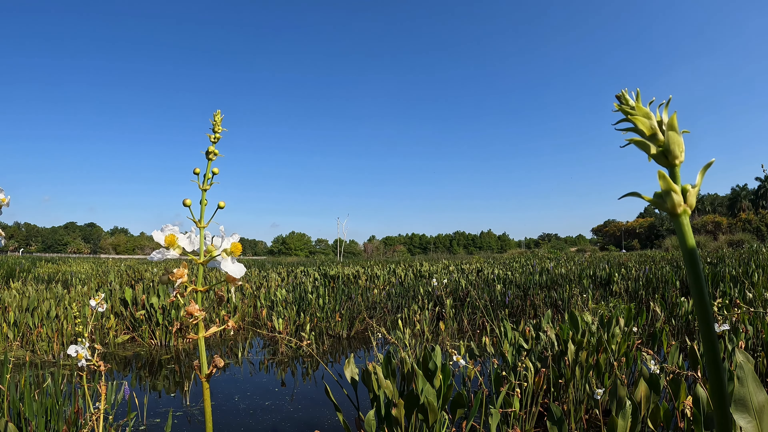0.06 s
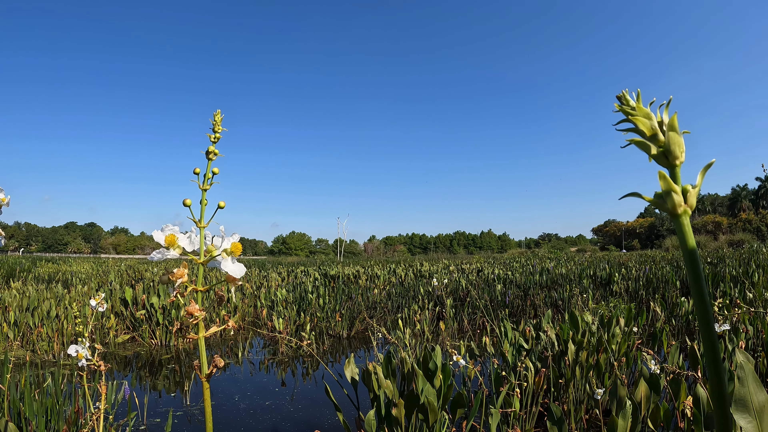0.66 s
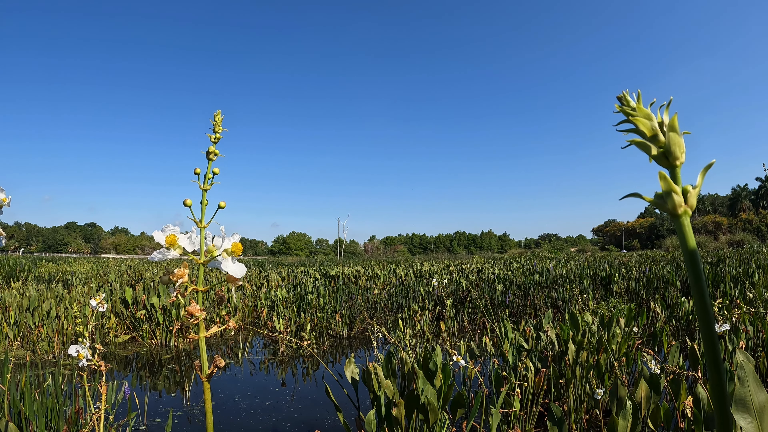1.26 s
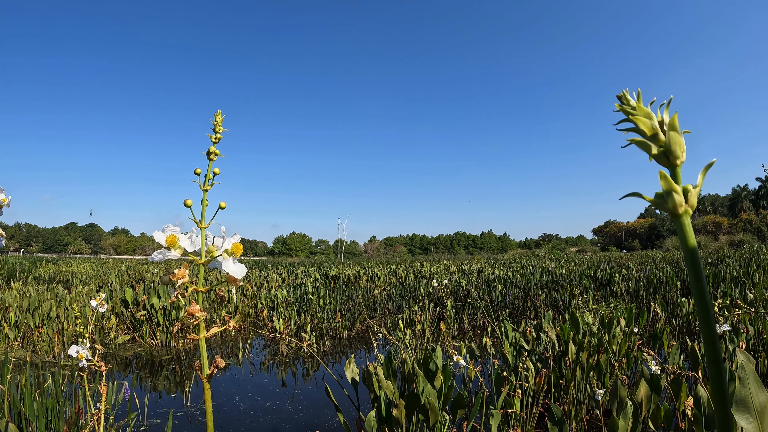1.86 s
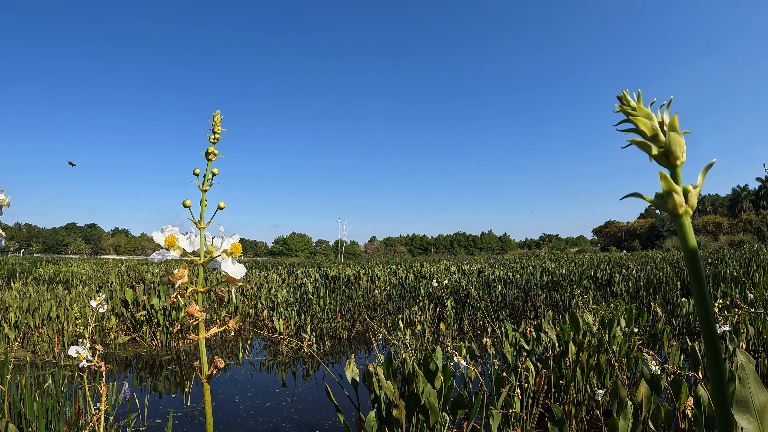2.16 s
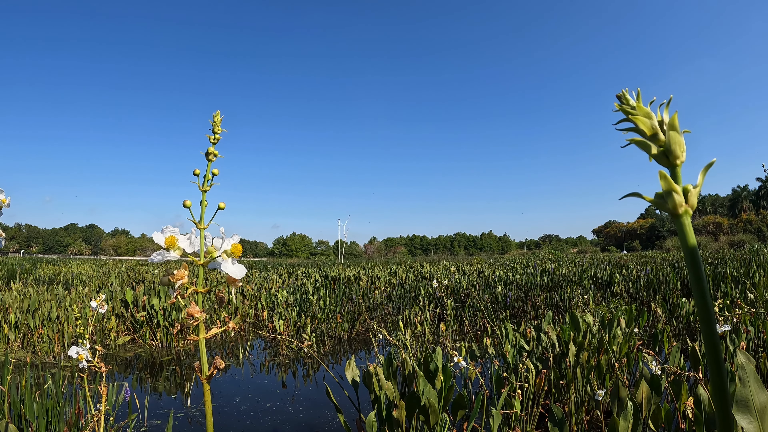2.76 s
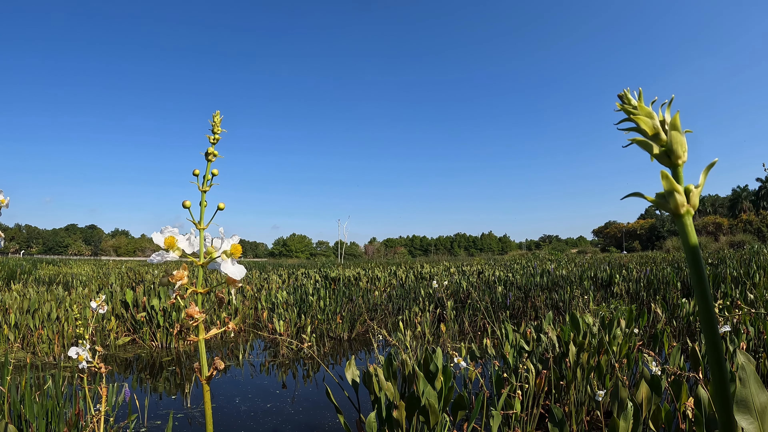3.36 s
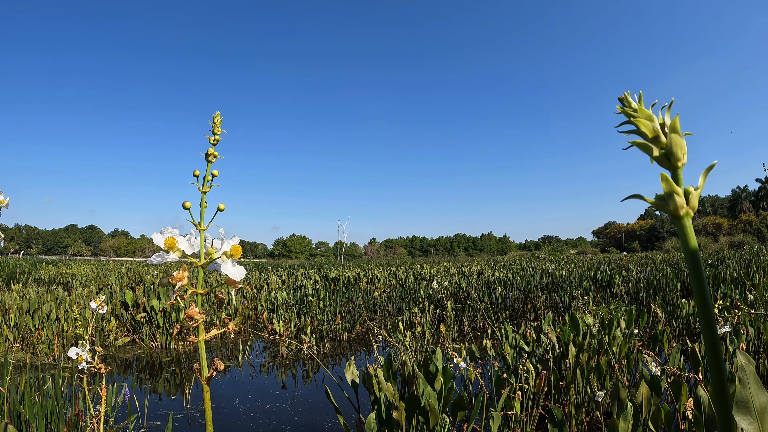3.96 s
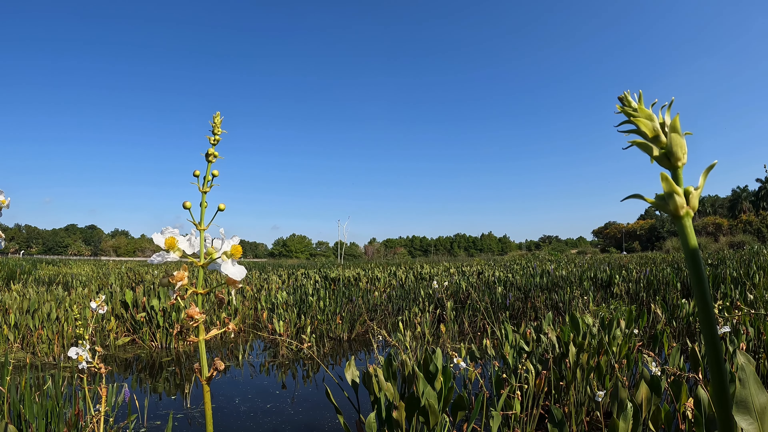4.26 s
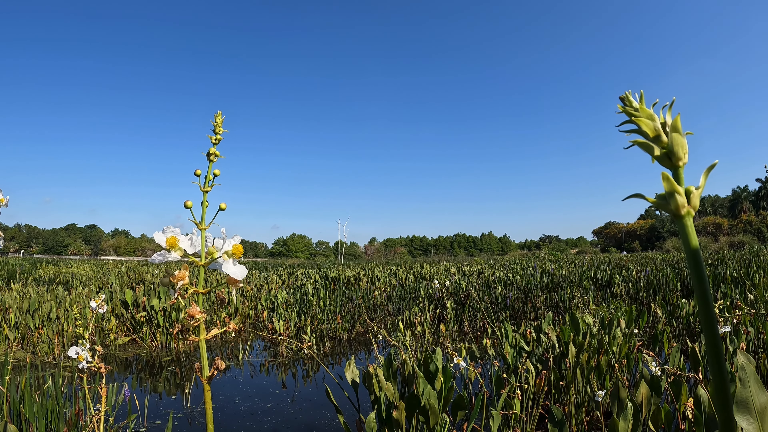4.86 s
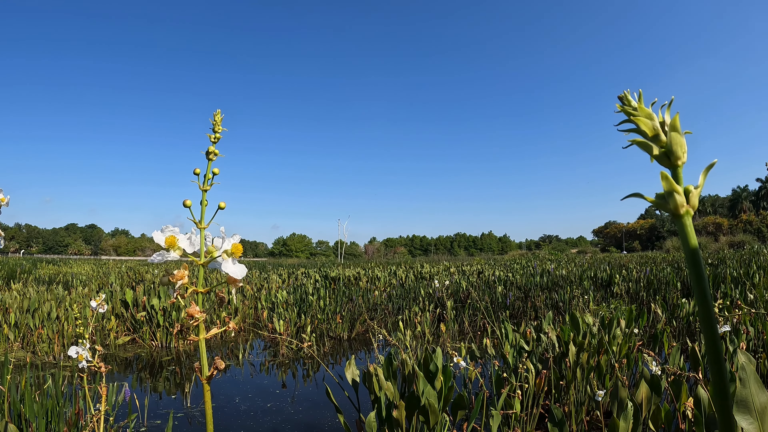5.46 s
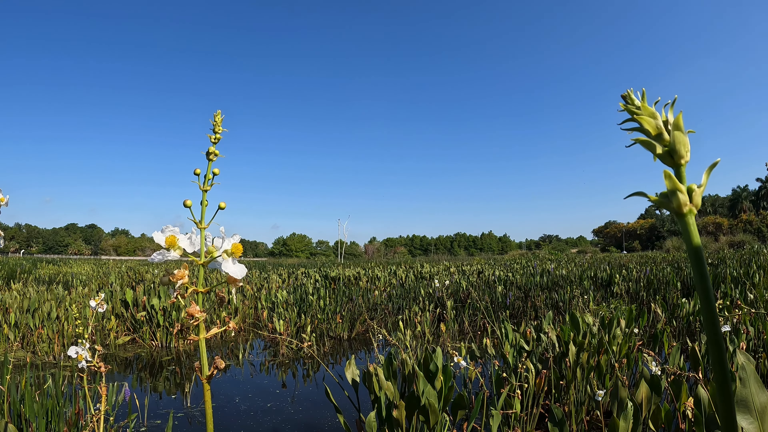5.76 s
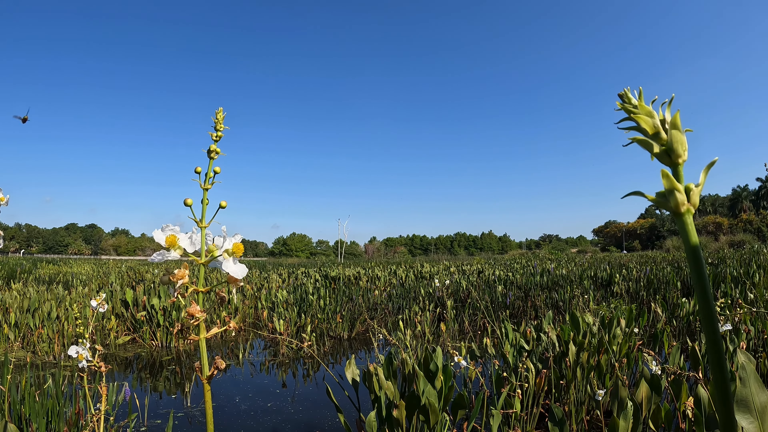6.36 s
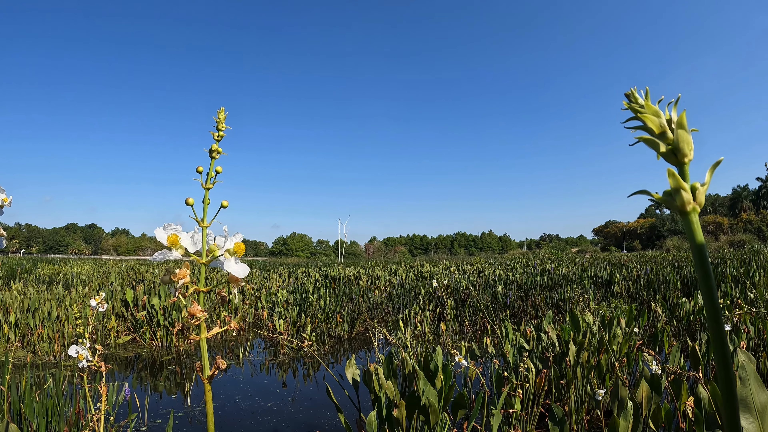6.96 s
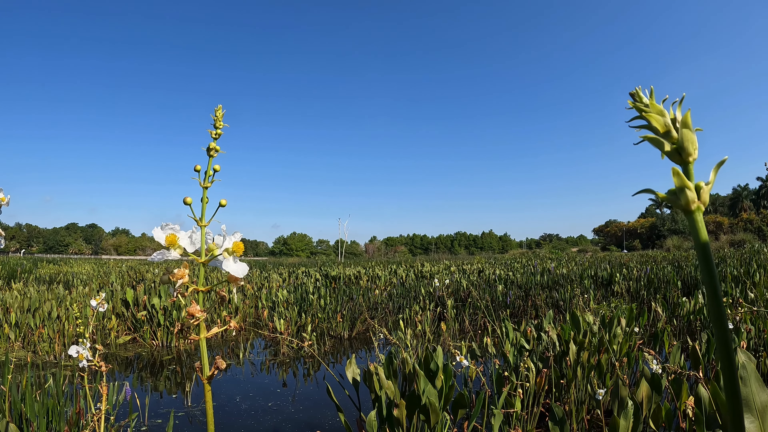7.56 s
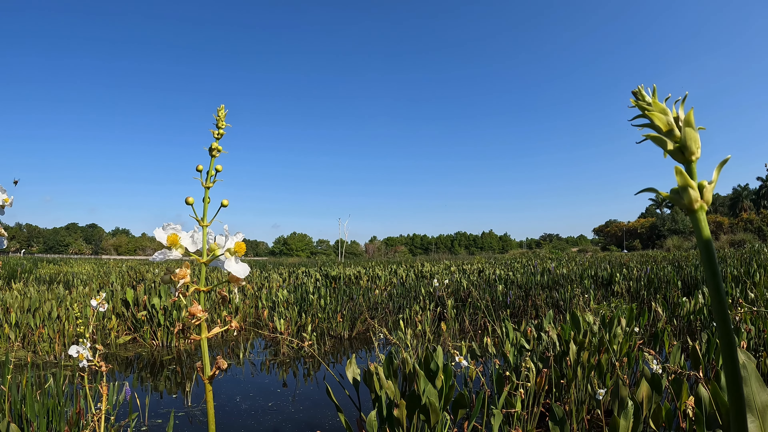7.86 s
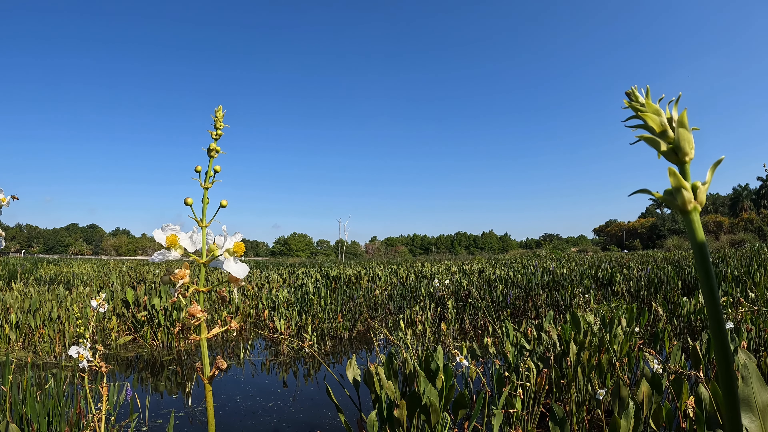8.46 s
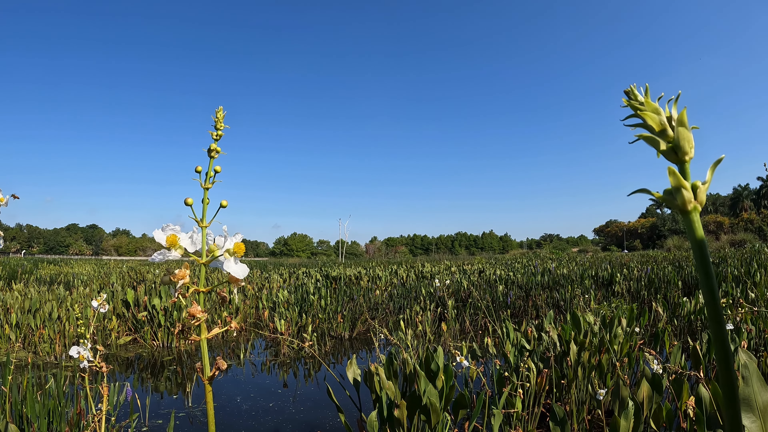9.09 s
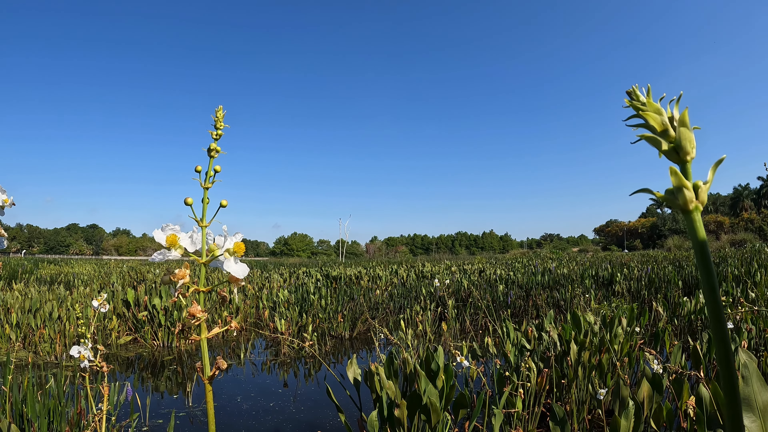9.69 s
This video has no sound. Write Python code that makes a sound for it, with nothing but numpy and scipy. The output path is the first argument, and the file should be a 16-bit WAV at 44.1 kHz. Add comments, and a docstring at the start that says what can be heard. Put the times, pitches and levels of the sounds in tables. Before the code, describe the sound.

Distant traffic rumbles low beneath quiet wetland birdsong, with a few soft gusts on the microphone at first. A wading bird yelps again and again, pausing briefly midway. A blackbird sings one gurgling phrase ending in a buzz, followed by a run of dry chacks. Short chirps, rasps and mews come from the reeds, with far hoots late on and faint, high insect bursts all along.

```python
"""Still morning on a freshwater marsh.

A wading bird yelps over and over, harmonics bending down through its throat resonances. A blackbird
sings one gurgle and buzzing trill, and other birds mew, whistle, hoot, chack and rasp from the reeds.
Insects scrape their wings in shrill bursts. Distant traffic rumbles and a light breeze brushes
the microphone."""
import sys
import numpy as np
from scipy import signal
from scipy.fft import rfft, irfft, next_fast_len
from scipy.io import wavfile
from scipy.ndimage import uniform_filter1d

SR = 44100
rng = np.random.default_rng(int(sys.argv[2]) if len(sys.argv) > 2 else 0)


def file_out(sig):
    """Save sig as 16-bit WAV at sys.argv[1]."""
    # one column per channel
    cols = np.atleast_2d(sig).T
    # limit, then scale
    lim = np.clip(cols, -1, 1)
    pcm = np.round(lim * 32767).astype(np.int16)
    wavfile.write(sys.argv[1], SR, pcm)


N = 429093
TIME = np.arange(N) / SR


def from_db(db):
    """Decibels to gain."""
    return 10 ** (np.asarray(db) / 20)


def rms_one(x):
    """Scale to rms 1."""
    return x / np.sqrt(np.mean(x ** 2) + 1e-20)


def phase_of(hz):
    """Running phase of a moving pitch."""
    return 2 * np.pi * np.cumsum(hz) / SR


def gain_at(points, hz):
    """Gain of an EQ curve on a log-frequency axis; it rolls off above the last point."""
    f, db = np.transpose(points)
    return from_db(np.interp(np.log(hz + 1e-3), np.log(f), db)) / np.maximum(hz / f[-1], 1) ** 4


def wobble(size, rate):
    """Smooth random modulation of spread 1 that changes rate times a second."""
    knots = rng.standard_normal(N // 64)
    position = np.arange(size) * rate / SR % len(knots)
    return np.interp(position, np.arange(len(knots)), knots) / np.sqrt(2 / 3)


def swells(crests, rise_s, fall_s):
    """Gain that rises to each crest (s, dB) and sinks again."""
    power = 0
    for crest, db in crests:
        offset = (TIME - crest) / np.where(TIME < crest, rise_s, fall_s)
        power += from_db(db) ** 2 / (1 + offset ** 2) ** 3
    return np.sqrt(power)


def pan(x, left_db):
    """Lean a sound to the left by a level difference."""
    return x * from_db(np.array([[.5], [-.5]]) * left_db)


def noise(colour, alike):
    """Coloured stereo noise of rms 1; alike runs from 0 (wide) to 1 (mono)."""
    white = rng.standard_normal((2, N))
    mid, side = irfft(rfft(white) * gain_at(colour, np.fft.rfftfreq(N, 1 / SR)), N)
    return rms_one(np.sqrt(1 + alike) * mid + np.sqrt(1 - alike) * side * [[1], [-1]])


def butter(x, order, hz, kind="low"):
    """Butterworth filter."""
    return signal.sosfilt(signal.butter(order, hz, kind, fs=SR, output="sos"), x)


def add(out, start, sound, level_db, edge):
    """Place a note, fading in and out over a share of its length."""
    u = np.linspace(0, 1, len(sound))
    fade = np.sin(np.pi / 2 * np.clip(np.minimum(u, 1 - u) / max(edge, .02), 0, 1)) ** 2
    at = max(int(start * SR), 0)
    out[at:at + len(sound)] += (from_db(level_db) * fade * rms_one(sound))[:N - at]


def marsh(x, left_db, wet_db, t60):
    """Reeds and the tree line scatter a call into a short, thin tail."""
    t = np.arange(SR) / SR
    shared, *own = rng.standard_normal((3, SR)) * (rng.random((3, SR)) < .05)
    tail = (shared + 0.55 * np.array(own)) * from_db(-60 * t / t60) * (1 - np.exp(-t / 0.0031))
    tail /= np.sqrt(np.sum(tail ** 2, axis=1, keepdims=True))
    wet = signal.fftconvolve(x[None], tail, axes=1)[:, :N]
    return pan(x + from_db(wet_db) * wet, left_db)


def reeds():
    """The faint steady hush of the reed bed."""
    return from_db(-74.5) * noise([(3200, -6), (4500, -7), (13000, -20)], alike=0.69)


# EQ of far engines, one heavier vehicle and tyres. Each row: frequency in Hz, gain in dB.
ENGINE_EQ = [(15, -4.5), (30, 5), (45, 0.5), (65, 0.5), (90, 0.5), (125, -8), (190, -14), (250, -22.5),
             (330, -28.5), (550, -39), (1200, -84)]
VEHICLE_EQ = [(50, -4), (95, 2), (165, -3.5), (260, -19.5), (500, -32.5)]
TYRE_EQ = [(350, -8.5), (600, -11), (750, 0), (930, 2), (1200, -3.5), (1600, -10.5), (2000, -16.5)]
# The tyre rush creeps up. Each row: time in seconds, relative level in dB.
TYRE_FADER = [(0.0, -60), (4.44, -59), (9.73, -54.5)]


def traffic():
    """Soft ground swallows the middle, leaving engine rumble below and tyre rush near 1 kHz."""
    engines = from_db(-38) * noise(ENGINE_EQ, alike=.99)
    vehicle = swells([(3.92, -43)], rise_s=1, fall_s=1) * noise(VEHICLE_EQ, alike=1)
    tyre_db = np.interp(TIME, *np.transpose(TYRE_FADER)) + 1.31
    return engines + vehicle + from_db(tyre_db) * noise(TYRE_EQ, alike=0.84)


# EQ of air on the microphone. Each row: frequency in Hz, gain in dB.
BREEZE_EQ = [(27, 7.5), (55, -24.5), (220, -25.5), (600, -46)]
# Three gusts. Each row: crest in seconds, level in dB.
GUSTS = [(.42, -33), (.99, -30), (1.88, -38.5)]


def breeze(lull_db=-41.5):
    """Lumpy eddies buffet the microphone, mostly on the right port."""
    strength = from_db(lull_db) + swells(GUSTS, rise_s=0.2, fall_s=0.2)
    eddies = from_db(1.1 * wobble(N, 11))
    return pan(strength * eddies * noise(BREEZE_EQ, alike=0.88), left_db=-8)


# EQ of the high insect sizzle. Each row: frequency in Hz, gain in dB.
SIZZLE_EQ = [(5000, -25), (7000, -2), (8500, -10.5), (10500, -4), (11450, -6.5), (11950, -2.5),
             (12400, -5.5), (13500, -21)]
# It swells about every three quarters of a second. Each row: crest in seconds, level in dB.
SIZZLE_SWELLS = [(.38, -77), (1.2, -78), (1.8, -76), (2.55, -72), (3.15, -72.5), (3.93, -75), (4.53, -75),
                 (5.38, -75), (6.15, -73.5), (6.8, -75), (7.45, -74), (8.33, -73.5), (8.95, -75.5),
                 (9.65, -76)]


def insect_chorus():
    """Many scraping wings blur into a far shrill and a higher, swelling sizzle."""
    far_eq = [(4200, -19.5), (5300, -8.5), (5780, -4), (6800, -20.5)]
    far = from_db(-70.5 + 1.75 * wobble(N, 6.5)) * noise(far_eq, alike=0.75)
    surge = swells(SIZZLE_SWELLS, rise_s=0.4, fall_s=0.31)
    return far + surge * from_db(wobble(N, 130)) * noise(SIZZLE_EQ, alike=0.75)


# EQ of the near insect, peaking around 6 kHz. Each row: frequency in Hz, gain in dB.
SHRILL_EQ = [(3500, -49), (4900, -55), (5550, -14), (5880, 2), (6030, -8.5), (6190, 4), (6330, -9),
             (6650, -22), (8000, -50)]
# Its rests between bursts. Each row: midpoint in seconds, length in seconds.
SHRILL_RESTS = [(0.233, 0.14), (0.807, 0.15), (1.143, 0.2), (1.734, .12), (2.13, 0.13), (2.713, 0.076),
                (3.444, 0.13), (4.11, 0.12), (4.373, 0.1), (4.745, 0.1), (5.08, 0.11), (5.688, 0.11),
                (6.63, 0.16), (6.983, .17), (7.59, 0.075), (7.95, .12), (8.58, 0.13), (8.99, 0.18)]


def near_insect(strokes_per_s=84, floor_db=-68, stroke_db=3.5):
    """A wing file scrapes in fast uneven strokes, pausing briefly between bursts."""
    singing = np.all([np.abs(TIME - rest) > length / 2 for rest, length in SHRILL_RESTS], axis=0)
    gate = uniform_filter1d(singing * 1.0, size=1500)
    strokes = np.cos(phase_of(strokes_per_s * (1 + .01 * wobble(N, 10))) / 2) ** 16
    teeth_db = wobble(N, 250)
    return gate * from_db(floor_db + stroke_db * strokes + teeth_db) * noise(SHRILL_EQ, alike=1)


def glides(notes, rise, rough):
    """Fluttering near-sine notes (start, length, Hz, dB) that slide by a share of their pitch."""
    out = np.zeros(N)
    for start, length, hz, level_db in notes:
        size = int(length * SR)
        slide = rise * np.linspace(-.5, .5, size)
        phase = phase_of(hz * (1 + slide + 0.09 * rough * wobble(size, 895)))
        add(out, start, np.sin(phase) * (1 + rough * wobble(size, 315)), level_db, edge=0.1)
    return out


# Thin, high whistles. Each row: start in seconds, level in dB.
WHISTLES = [(.224, -84), (3.08, -79)]
# Quick squeaks. Each row: start in seconds, pitch in Hz, level in dB.
SQUEAKS = [(1.355, 5120, -65), (2.428, 3830, -60.5), (5.913, 4170, -60.5)]
# Far hoots. Each row: start in seconds, length in seconds, pitch in Hz, level in dB.
HOOTS = [(4.61, 0.11, 922, -63.5), (8.428, 0.19, 921, -57.5), (9.227, 0.117, 970, -54.5)]


def whistles_and_hoots():
    """Almost pure bird tones: whistles sink, squeaks flick up and hoots stay nearly level."""
    whistles = glides([(start, 0.38, 6850, db) for start, db in WHISTLES], rise=-0.2, rough=0.11)
    squeaks = glides([(start, 0.033, hz, db) for start, hz, db in SQUEAKS], rise=0.22, rough=0.6)
    return whistles + squeaks + glides(HOOTS, rise=-0.024, rough=0.43)


def harsh(notes, fall, skirt_db, skirt_spread=2.6):
    """Grainy syrinx noise (start, length, Hz, width, dB) around a resonance that sinks by a share."""
    out = np.zeros(N)
    for start, length, hz, width_hz, level_db in notes:
        size = int(length * SR)
        air = rng.standard_normal((2, size)) * from_db(wobble(size, 350))
        core = butter(air, 3, width_hz / 2)
        skirt = butter(air, 3, skirt_spread * width_hz / 2)
        flutter = core + from_db(skirt_db) * skirt
        phase = phase_of(hz * (1 + fall * np.linspace(.5, -.5, size)))
        add(out, start, flutter[0] * np.cos(phase) + flutter[1] * np.sin(phase), level_db, edge=0.24)
    return out


# Dry chacks, about four a second. Each row: start in seconds, level in dB.
CHACKS = [(3.308, -63), (3.562, -58.5), (3.802, -58.5), (4.024, -62), (4.261, -62), (4.455, -61)]
# Short, lower clucks. Each row: start in seconds, centre in Hz, level in dB.
CLUCKS = [(4.769, 3250, -56), (5.136, 2236, -59.5), (9.405, 1865, -52.5)]
# Hoarse rasps; the one at 3.12 s is the falling tail of the blackbird's trill. Each row: start and length in
# seconds, centre and width in Hz, level in dB.
RASPS = [(.015, 0.043, 3470, 250, -66.5), (.6, 0.22, 2840, 800, -71), (1.507, 0.12, 3565, 300, -57.5),
         (2.3, 0.56, 4200, 1830, -70), (3.12, 0.15, 3450, 600, -57.5), (3.882, 0.49, 3730, 1030, -70),
         (5.38, 0.21, 3470, 1170, -63.5), (5.55, .49, 2780, 385, -67.5), (6.112, 0.15, 3380, 453, -61),
         (6.683, 0.21, 3420, 500, -66.5), (8.43, 0.11, 3330, 800, -67.5)]


def scolding():
    """Birds in the reeds chack, cluck and rasp in down-slurred bands of noise; the rasp at 3.12 s is the
    falling tail of the blackbird's trill."""
    chacks = harsh([(start, 0.055, 4650, 1250, db) for start, db in CHACKS], fall=.08, skirt_db=-6)
    clucks = harsh([(start, 0.03, hz, 950, db) for start, hz, db in CLUCKS], fall=.12, skirt_db=-6)
    return chacks + clucks + harsh(RASPS, fall=0.23, skirt_db=-9)


def scooped(notes, scoop, onset_rough, steady_rough, settle_s=0.0153):
    """Each note (start, length, Hz, dB) opens rough and flat by a share, then settles up to pitch."""
    out = np.zeros(N)
    for start, length, hz, level_db in notes:
        size = int(length * SR)
        unsettled = np.exp(-np.arange(size) / SR / settle_s)
        rough = steady_rough + onset_rough * unsettled
        phase = phase_of(hz * (1 - scoop * unsettled + 0.079 * rough * wobble(size, 879)))
        add(out, start, np.sin(phase) * (1 + rough * wobble(size, 375)), level_db, edge=0.21)
    return out


# Pips, all on one note. Each row: start in seconds, length in seconds, level in dB.
PIPS = [(0.465, 0.069, -70.5), (2.979, 0.077, -51.5), (4.4, 0.042, -59.5), (4.788, 0.037, -63.5),
        (5.07, 0.03, -67), (6.298, 0.076, -51.5), (7.578, 0.038, -61), (7.97, 0.042, -70),
        (8.658, 0.07, -50.5)]


def pips(hz=4875, scoop=0.0363, spit_s=0.02, break_db=-44):
    """A scooped whistle; forced hard, it opens with a higher spit, rasps and splits into half pitches."""
    tones, spits, rasps, halves = [], [], [], []
    for start, length, db in PIPS:
        rasp_db = break_db + 1.75 * (db - break_db)   # would match the tone at break_db
        tones.append((start, length, hz, db))
        spits.append((start - spit_s, spit_s, 5380, 450, rasp_db))
        rasps.append((start - spit_s, length + spit_s, 5100, 1300, rasp_db))
        halves += [(start, length, ratio * hz, rasp_db - 13.5) for ratio in (0.5, 1.5)]
    return (scooped(tones, scoop, onset_rough=0.091, steady_rough=0.1)
            + scooped(halves, scoop, onset_rough=0.25, steady_rough=0.3)
            + harsh(spits, fall=0, skirt_db=-9, skirt_spread=5.3)
            + harsh(rasps, fall=0, skirt_db=-4.5, skirt_spread=2.9))


def nasal_calls(notes, length, throat, arch, jitter, rasp, uneven_db, edge=0.13, bend=0):
    """Harmonics drop through fixed throat resonances; arch places the pitch peak as a share of length."""
    out, u = np.zeros(N), np.linspace(0, 1, int(length * SR))
    for start, top_hz, fall, level_db, treble_db in notes:
        hz = top_hz * (1 - fall * ((u - arch) / (1 - arch)) ** 2)
        phase = phase_of(hz * (1 + jitter * wobble(len(u), 628) + bend * wobble(len(u), 40)))
        voice = 0
        for k in range(1, 9):
            harmonic_db = treble_db * (k > 2) + uneven_db * wobble(len(u), 54)
            voice += gain_at(throat, k * hz) * from_db(harmonic_db) * np.sin(k * phase)
        add(out, start, voice * (1 + rasp * wobble(len(u), 401)), level_db, edge)
    return out


# Thin mews. Each row: start in seconds, pitch in Hz that the note sags below, level in dB.
MEWS = [(.33, 860, -66.5), (.875, 847, -61), (5.939, 927, -65), (6.625, 890, -62), (6.83, 876, -61),
        (7.808, 925, -65.5), (9.325, 898, -63)]
# The mewing bird's throat. Each row: frequency in Hz, gain in dB.
MEW_THROAT = [(900, -9.5), (1800, -7.5), (3500, -9.5), (4300, 0.5), (5400, -22), (7000, -31)]


def mewing_bird():
    """Short nasal notes sag gently through a bright throat."""
    notes = [(start, hz, 0.0685, db, 0) for start, hz, db in MEWS]
    return nasal_calls(notes, 0.087, MEW_THROAT, arch=-0.78, jitter=0.0029, rasp=0.25, uneven_db=2.5)


def trill(start=2.785, length=0.328, hz=3830, pulse_s=0.00044, fade_db_per_s=12):
    """A down-flick, then a hissy buzz: each cycle fires a close pair of tone pulses and a weak third."""
    out = glides([(2.772, 0.0081, 5180, -46.5)], rise=-0.44, rough=0.6)
    t = np.arange(int(length * SR)) / SR
    cycles_per_s = 122 - 20 * t   # slows a little as it fades
    cycle = np.cumsum(cycles_per_s * (1 + .008 * wobble(len(t), 120))) / SR % 1
    buzz = 0
    for delay_s, db in ((.0015, 0), (.0032, -2), (.0062, -12)):
        lag = cycle / cycles_per_s - delay_s
        pulse = from_db(db + wobble(len(t), 123)) * np.exp(-.5 * (lag / pulse_s) ** 2)
        buzz += pulse * np.sin(2 * np.pi * lag * hz)
    hiss_eq = [(2000, -9), (3500, -6.5), (5200, -5), (6500, -13), (7000, -1.5), (7600, -30)]
    hiss = from_db(-11) * noise(hiss_eq, alike=0.75)[0, :len(t)]
    add(out, start, (rms_one(buzz) + hiss) * from_db(-fade_db_per_s * t), level_db=-46.5, edge=0.02)
    return out


# The blackbird's liquid notes. Each row: start and length in seconds, pitch in Hz, level in dB.
GURGLES = [(2.36, 0.025, 1453, -55), (2.453, 0.067, 1581, -51.5), (2.478, 0.08, 1415, -53.5),
           (2.486, 0.077, 2945, -62.5), (2.58, 0.134, 3104, -61), (2.676, 0.094, 2870, -61),
           (2.7, 0.059, 2297, -48), (3.139, 0.085, 2394, -47)]


def blackbird():
    """One song from the left: overlapping scooped notes gurgle into the trill."""
    gurgle = scooped(GURGLES, scoop=0.104, onset_rough=1, steady_rough=0.12)
    return (marsh(gurgle, left_db=7, wet_db=-3, t60=0.31)
            + marsh(trill(), left_db=5.5, wet_db=-3.5, t60=0.27))


# The wading bird's yelps. Each row: start in seconds, top pitch in Hz, share by which the pitch drops,
# level in dB, treble gain in dB.
YELPS = [(.812, 781, 0.21, -53.5, -0.5), (1.426, 772, 0.21, -55.5, -2), (1.83, 784, 0.33, -59, -3),
         (2.166, 794, 0.28, -55.5, -3.5), (2.537, 810, .27, -51.5, -5.5), (2.948, 807, 0.24, -52.5, -4),
         (3.388, 816, 0.27, -53, 3.5), (3.812, 790, 0.2, -51.5, -1), (4.262, 781, 0.12, -54, 0),
         (4.823, 795, 0.13, -54, 0.5), (6.352, 781, 0.084, -54.5, -4), (6.825, 812, 0.26, -54, -11),
         (7.215, 805, .25, -52.5, -4), (7.706, 763, 0.18, -52.5, 2), (8.09, 807, 0.22, -54, 2),
         (8.505, 828, 0.23, -50.5, -0.5), (8.93, 828, 0.24, -52.5, 0), (9.498, 782, 0.13, -50.5, 0.5)]
# One call drawn out on a nearly level pitch. Each row: start in seconds, top pitch in Hz, level in dB.
WAIL = [(5.73, 747, -56.5)]
# The wading bird's throat. Each row: frequency in Hz, gain in dB.
WADER_THROAT = [(750, 0), (1530, 4), (2050, -7), (2350, -2), (2650, -10), (3050, 1), (3450, -6),
                (3900, -12), (4700, -29)]


def wading_bird(yelp_s=.098, wail_s=0.17, lead_s=0.1, hang_s=0.005):
    """Each yelp starts as toneless rasp in the throat, which carries on under the down-bent voice."""
    yelps = nasal_calls(YELPS, yelp_s, WADER_THROAT, arch=0.034, jitter=0.011, rasp=0.25,
                        uneven_db=4, edge=0.33, bend=0.0061)
    air = butter(noise(WADER_THROAT, alike=0.84)[0], 2, [1900, 3600], "band")
    air *= from_db(1.1 * wobble(N, 200))
    for start, _, _, level_db, _ in YELPS:
        span = (TIME > start - lead_s) & (TIME < start + yelp_s + hang_s)
        add(yelps, start - lead_s, air[span], level_db - 13, edge=0.37)
    held = [(start, hz, 0.016, db, 0) for start, hz, db in WAIL]
    wail = nasal_calls(held, wail_s, WADER_THROAT, arch=0.17, jitter=0.012, rasp=.2, uneven_db=2.5)
    return butter(yelps + wail, 4, hz=4470)   # distance takes the top off


def scene():
    """The birds sound from their own places in the marsh, over reeds, traffic, breeze and insects."""
    wader = marsh(wading_bird(), left_db=-1.5, wet_db=-8, t60=0.27)
    mewer = marsh(mewing_bird(), left_db=-2, wet_db=-7, t60=.25)
    others = marsh(pips() + whistles_and_hoots() + scolding(), left_db=0.6, wet_db=-1.5, t60=0.44)
    bed = reeds() + traffic() + breeze() + insect_chorus() + near_insect()
    return bed + others + mewer + blackbird() + wader


# The microphone's two ports. Each row: frequency in Hz, left phase lead in radians, left excess in dB.
MIC_PORTS = [(100, 0.035, 0), (402, -0.76, -0.5), (760, 0.3, -0.7), (1250, -0.6, 4), (1410, -1, 2.2),
             (2280, -1.58, -2.5), (2860, 0.42, 0.6), (4100, 0.5, 2), (6100, 0.87, 1), (8700, 0.64, 0.5),
             (12500, -0.13, 6)]


def ports(x):
    """The body of the microphone shifts phase and level between its two ports."""
    hz, lead, left_db = np.transpose(MIC_PORTS)
    size = next_fast_len(N + SR)
    bins_hz = np.fft.rfftfreq(size, 1 / SR)
    spectrum = pan(rfft(x, size), np.interp(bins_hz, hz, left_db))
    phase_shift = np.exp(np.array([[.5j], [-.5j]]) * np.interp(bins_hz, hz, lead))
    return irfft(spectrum * phase_shift, size)[:, :N]


def record(dry, cutoff_hz=13760):
    """The microphone colours each side and loses the deepest bass; the ends fade and the top is cut."""
    fade = np.minimum(np.minimum(TIME, TIME[-1] - TIME) / .005, 1)
    picked_up = butter(ports(dry * fade), 2, 14, "high")
    return signal.sosfilt(signal.ellip(10, .1, 80, cutoff_hz, fs=SR, output="sos"), picked_up)


dry = scene()
out = record(dry)
file_out(out)
```